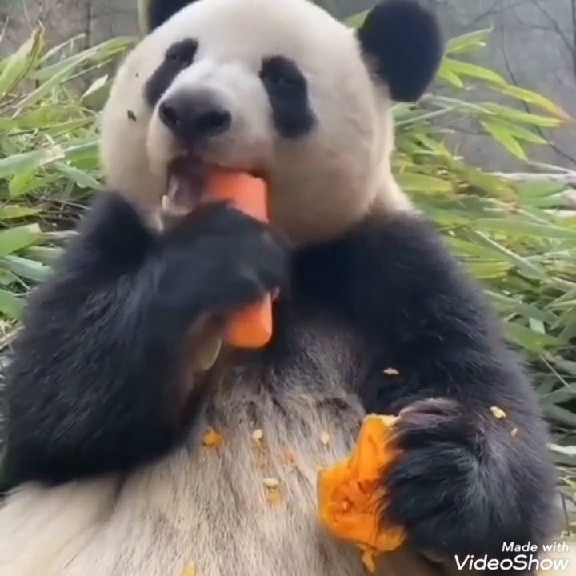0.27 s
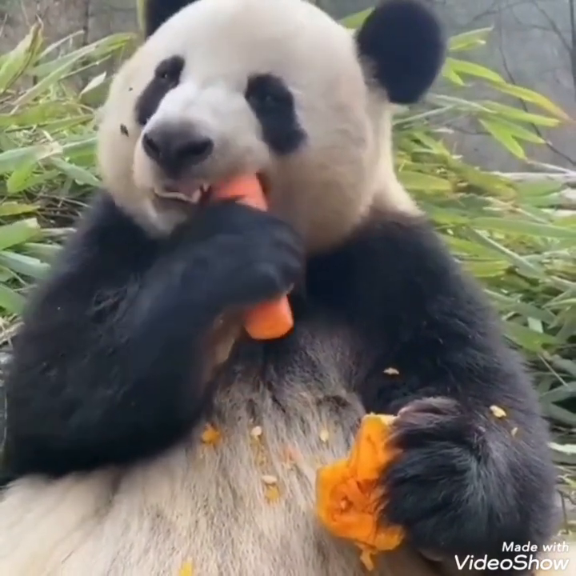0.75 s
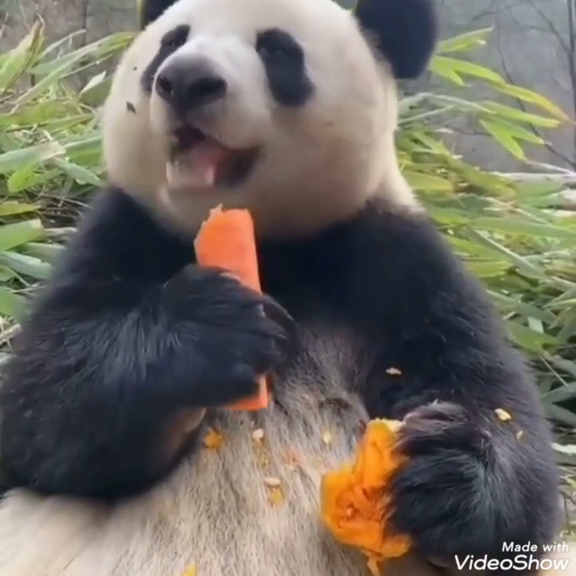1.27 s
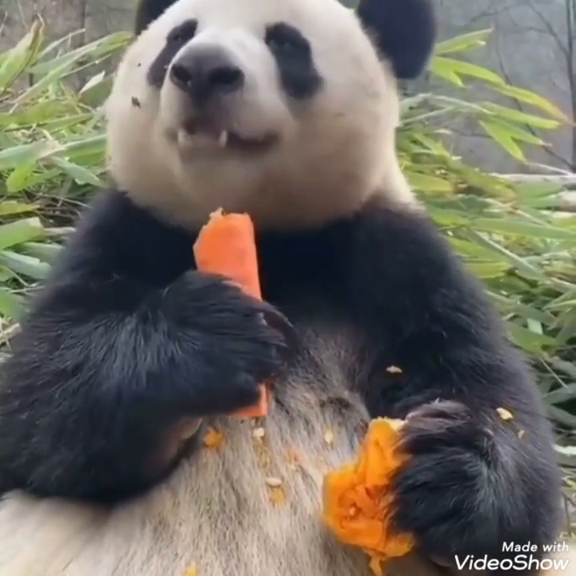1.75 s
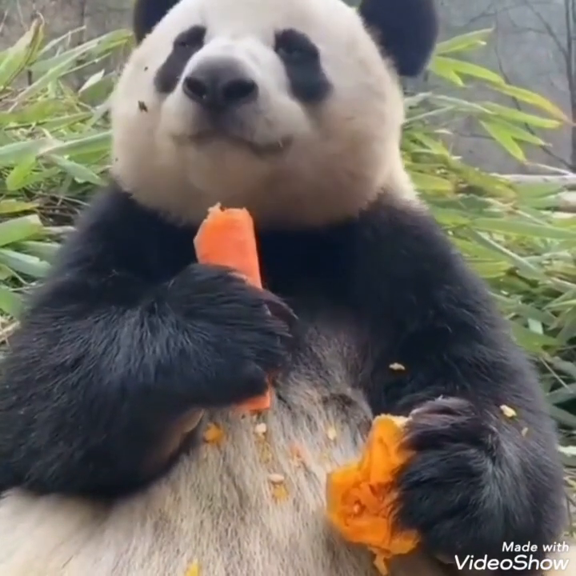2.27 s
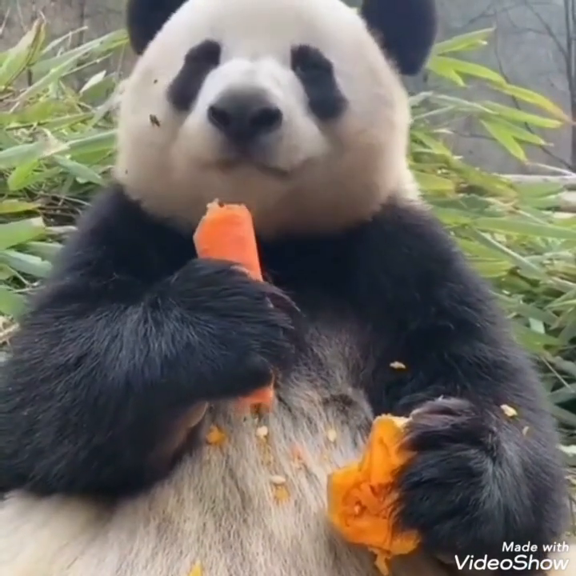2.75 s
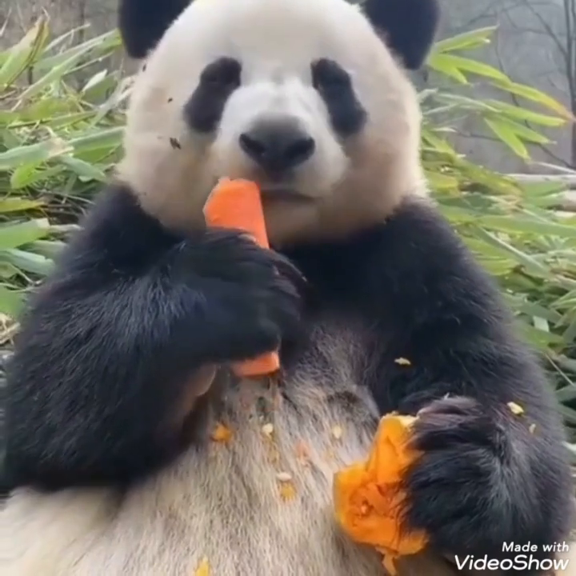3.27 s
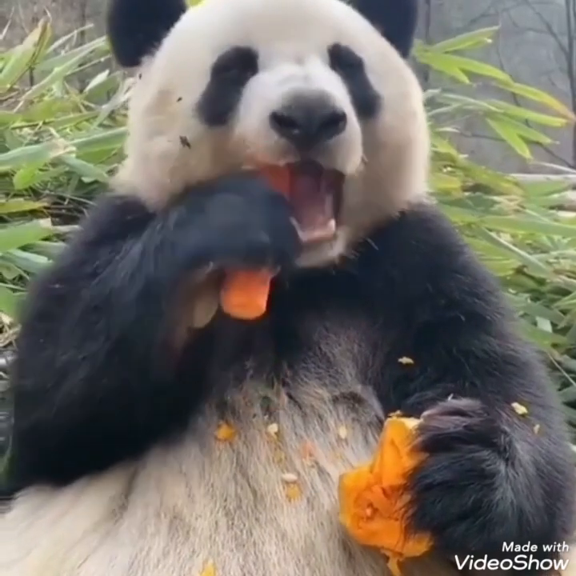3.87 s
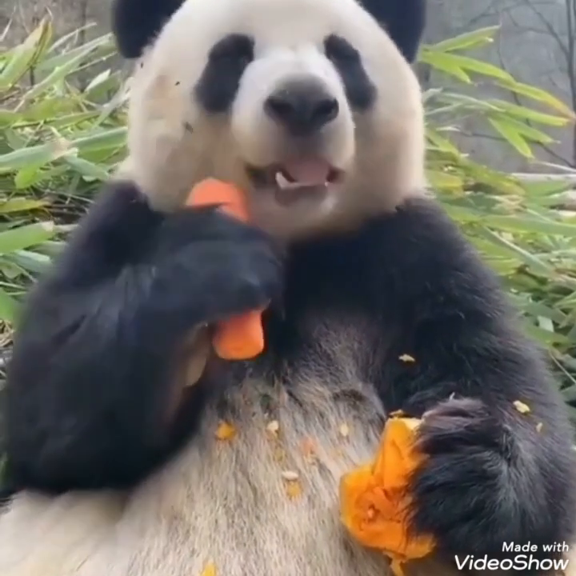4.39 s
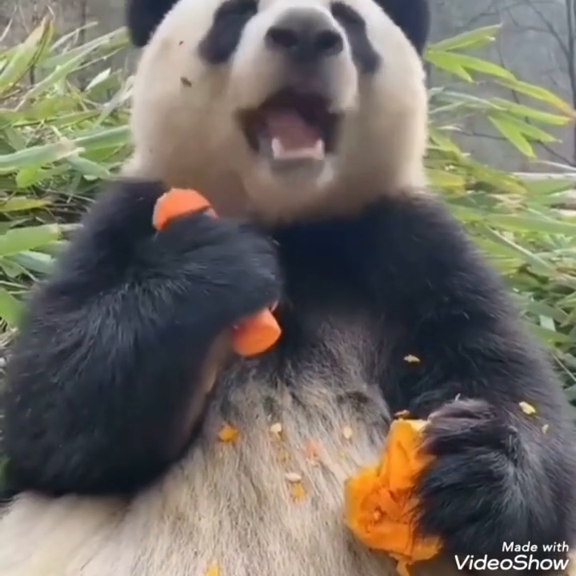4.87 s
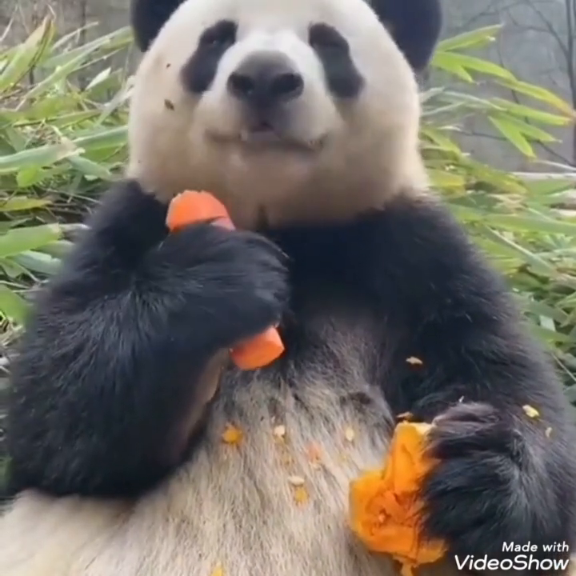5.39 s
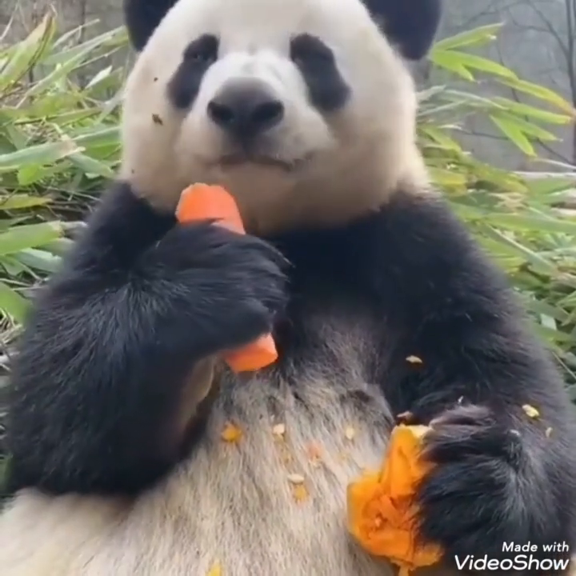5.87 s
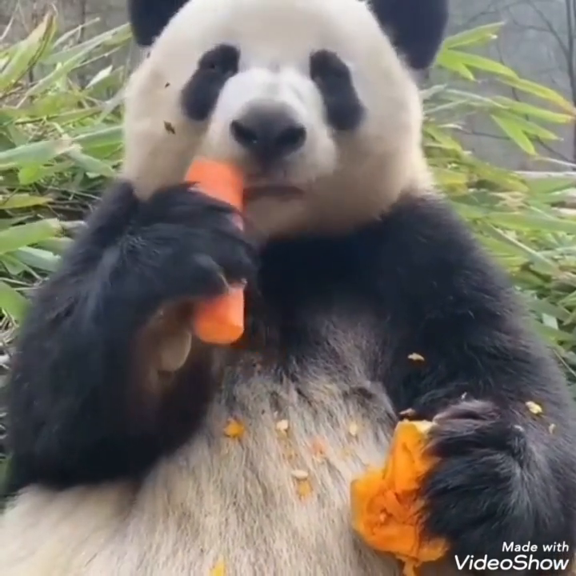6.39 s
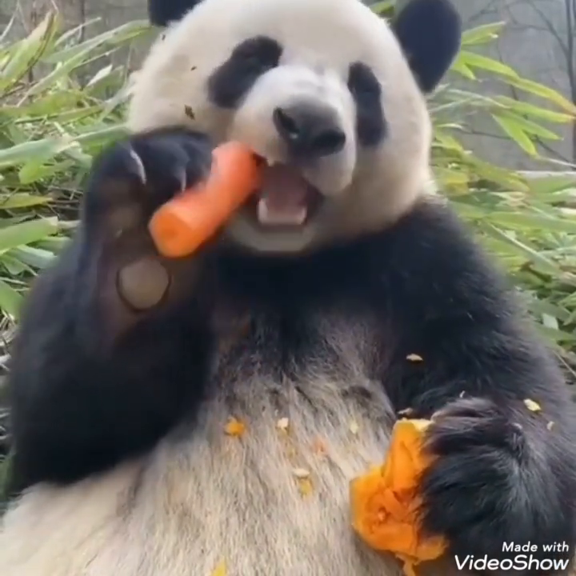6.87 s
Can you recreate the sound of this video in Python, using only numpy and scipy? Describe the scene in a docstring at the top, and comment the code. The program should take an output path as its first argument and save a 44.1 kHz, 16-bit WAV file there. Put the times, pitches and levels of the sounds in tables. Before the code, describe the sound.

Close to the microphone, a bear bites into a raw carrot with a quick cluster of sharp cracks, then grinds it in a run of juicy, irregular crunches. Just past the middle another hard snap comes, followed by a short lull and more crunching to the end. Moist mouth smacks and little thumps of parting lips dot the chewing, over a soft outdoor hiss and a faint low hum.

```python
"""Outdoors, up close: a bear chews a raw carrot.
Each jaw stroke crushes cells into a dense crackle that rings in the mouth, over a bed of wet mashing.
Larger pieces snap, small air pockets smack, and wet lips pop open with a falling thump.
Under it all lie a soft flickering hiss, a low rumble and hum, and a jaw drone that swells with chewing."""
import sys
import numpy as np
from scipy import signal
from scipy.io import wavfile
from scipy.ndimage import uniform_filter1d

SR = 44100
rng = np.random.default_rng(int(sys.argv[2]) if len(sys.argv) > 2 else 0)


def wrap_up_sound(samples):
    """Save the sound to the file named by the first command line argument, as 16-bit audio."""
    columns = np.atleast_2d(samples).T
    # keep every value between -1 and 1, then stretch to whole-number steps
    tamed = np.clip(columns, -1, 1)
    steps = np.round(tamed * 32767).astype(np.int16)
    wavfile.write(sys.argv[1], SR, steps)


N = 314433

# tone curve of the hiss: f/Hz, relative level/dB
HISS_CURVE = [(15, -41.5), (25, 11), (71, 10), (346, 3.5), (1080, 1.5), (1420, -21.5), (1780, -10),
              (2230, -1.5), (3750, -21), (7690, -40.5), (9380, -11.5), (12200, -56.5), (20600, -120)]
# faders of the three low bands: t/s, rumble level/dB, jaw drone level/dB, hum level/dB
RUMBLE_FADERS = [(0.0, -75, -43.5, -54.5), (0.38, -61.5, -68.5, -73.5), (0.87, -57.5, -69, -59),
                 (1.15, -61.5, -65, -75.5), (2.18, -62.5, -79, -71), (2.46, -57.5, -60, -61),
                 (2.78, -66, -58, -70), (3.2, -63, -65.5, -61.5), (3.85, -65, -69.5, -68),
                 (4.83, -62, -65.5, -81), (5.06, -55, -46.5, -57), (5.3, -69.5, -62, -68),
                 (5.94, -58.5, -67, -53), (6.17, -66.5, -66, -57.5), (6.75, -62, -61, -55.5),
                 (7.13, -67, -78, -79)]
# two resonances each for rumble, jaw drone and hum: f/Hz, width/Hz, relative level/dB
RUMBLE_BANDS = [[(61, 31, -0.0052), (93.6, 18, -1.2)], [(138, 90, 18.0), (214, 52, -15.5)],
                [(269.6, 79, 0.97), (460.0, 244, 0.47)]]
# faders of the wet mashing: t/s, body level/dB, treble level/dB
MASH_FADERS = [(0.0, -52, -55), (0.16, -48.5, -49.5), (0.4, -67.5, -60), (0.71, -53, -68),
               (1.2, -59.5, -54.5), (1.27, -63.5, -66.5), (1.39, -56, -52.5), (1.53, -56.5, -58.5),
               (2.88, -56, -57), (2.98, -54.5, -57), (3.73, -51.5, -54.5), (3.87, -61, -55.5),
               (4.45, -58, -56.5), (4.8, -64.5, -64), (4.91, -53.5, -65), (5.0, -58, -57.5),
               (5.82, -57, -52.5), (6.33, -51.5, -61), (6.75, -56.5, -53), (7.13, -57.5, -54.5)]
# resonances of head and carrot: f/Hz, width/Hz, relative level/dB
BODY_MODES = [(471, 380, -15), (850, 750, -7), (1450, 337, 4), (2070, 550, -0.5), (2760, 940, -2)]
# resonances of wet cell walls: f/Hz, width/Hz, relative level/dB
WALL_MODES = [(3280, 1820, 9), (4493, 1710, 13), (6335, 3280, 16.5), (8085, 3850, 11.5)]
# jaw strokes: t/s, length/s, top level/dB, place of the top/fraction of stroke, treble over body/dB,
# lower mouth resonance f/Hz, lower over upper resonance/dB
STROKES = [(.006, 0.13, -38, 0.63, -2.5, 1020, 0), (0.35, 0.046, -41, 0.66, 3.5, 1420, 14),
           (0.576, 0.15, -45.5, 0.53, 4, 730, 3), (0.692, 0.19, -32, 0.45, 0.5, 680, -13),
           (1.157, 0.076, -47, 0.9, -28, 1270, 7), (1.42, 0.15, -29.5, 0.48, -9, 874, -1.5),
           (1.648, 0.09, -30, 0.67, 0, 973, -0.5), (1.82, 0.16, -33, 0.48, -8, 1016, -4),
           (2.077, .12, -33, 0.66, 2.5, 1330, -14), (2.281, 0.15, -31.5, 0.46, -4.5, 1180, 1.5),
           (2.585, 0.088, -30.5, 0, -1, 1690, -4), (2.76, .14, -35, 0.47, -1, 740, 3),
           (3.051, 0.065, -35, 0.55, 0.5, 880, 3), (3.172, 0.16, -44, 0.05, -10, 825, 36),
           (3.44, 0.083, -46, 0.88, 6.5, 1410, 4), (3.606, 0.12, -44, 0.14, -4.5, 950, -2),
           (3.882, 0.06, -34.5, 0.4, -26, 765, 1), (4.092, 0.18, -37.5, 0.63, 9, 1450, -28),
           (4.237, 0.06, -21.5, 0.09, 2, 1410, -36), (4.644, 0.1, -43.5, 0.29, -5.5, 956, 5.5),
           (4.882, 0.094, -47.5, 0.4, -18, 700, 3), (5.011, .17, -29.5, 0.34, -5, 868, 1.5),
           (5.305, 0.048, -27, 0.03, 1, 960, -6), (5.438, 0.15, -36, 0.31, -7, 850, 3.5),
           (5.65, 0.16, -41, 0, -7.5, 1450, -3), (5.852, 0.13, -34.5, 0.3, -5.5, 856, 2.5),
           (6.109, 0.066, -29, 0.76, -7.5, 1200, 1.5), (6.25, 0.16, -46.5, 0.1, 1, 915, 23),
           (6.484, 0.048, -44.5, 0.33, 2.5, 1450, 7), (6.539, 0.048, -23.5, 0.48, -5.5, 1480, 29),
           (6.658, 0.21, -37, 0.17, -7.5, 916, 1), (6.899, 0.059, -39.5, 0.33, 2.5, 1020, -8),
           (7.016, 0.043, -34.5, 0.31, -5, 850, 0)]
# pieces that snap: t/s, level/dB, ring f/Hz, treble share/dB, 60 dB decay/s, build-up/ms
SNAPS = [(.023, -22.5, 905, -5.5, 0.018, 14), (0.059, -31, 869, 1, 0.04, 2.2),
         (0.08, -29, 2500, -16, 0.027, 2), (0.181, -30.5, 1280, 0.5, 0.014, 4.7),
         (0.269, -34.5, 2480, 0, 0.022, 0.65), (0.618, -30.5, 750, 0, 0.037, 1.7),
         (.712, -17, 2090, 0, 0.016, 1.5), (0.734, -9.5, 750, -.5, 0.036, 4.4),
         (0.753, -24, 2480, 0, 0.013, 1.3), (0.807, -19.5, 2700, 0, .03, 9.6),
         (0.812, -7, 2250, -12.5, 0.015, 0.88), (1.412, -34.5, 2800, 0, .01, .5),
         (1.435, -30.5, 2250, -7.5, .031, 2.2), (1.466, -24.5, 1330, -3.5, .035, 7.7),
         (1.491, -19, 2450, -5.5, 0.072, 5.5), (1.604, -30, 3240, 2, 0.03, 0.94),
         (1.647, -29.5, 2160, -1.5, 0.048, .8), (1.698, -21.5, 2140, -2, 0.037, 17),
         (2.043, -38.5, 1000, -17, 0.037, 1), (2.084, -31, 2670, -16, .072, 3.5),
         (2.133, -11, 2870, -2, 0.056, 9.1), (2.152, -32, 1300, -8, 0.021, 3),
         (2.293, -30, 1010, -4, 0.13, 2.5), (2.313, -31.5, 1100, -2, 0.025, 4.5),
         (2.348, -23.5, 1980, -5, 0.035, 3.8), (2.376, -24.5, 786, -2, 0.037, 11),
         (2.527, -26.5, 1410, 0, 0.015, 1.1), (2.567, -33.5, 3000, 0, 0.016, .8),
         (2.593, -19, 1900, 3, 0.027, 2.1), (2.622, -19, 1420, -1.5, 0.023, 2.7),
         (2.826, -27.5, 2560, -1, 0.05, 2.5), (3.008, -29.5, 1450, -1, 0.045, 2.6),
         (3.022, -14.5, 1010, -1, 0.021, 0.43), (3.065, -30, 1450, 0, 0.0092, .4),
         (3.081, -21.5, 2290, -8, 0.014, 4.3), (3.173, -31.5, 950, -13, 0.034, 1.9),
         (3.186, -24.5, 950, -2, 0.01, 1.8), (3.24, -28, 2700, 0, 0.022, 2.3),
         (3.323, -34, 1350, 0, 0.028, 1.7), (3.485, -18, 1120, -25, 0.042, .6),
         (3.497, -18.5, 1460, -8.5, 0.023, 3.9), (3.643, -31.5, 2680, -2.5, 0.013, 1.5),
         (3.662, -31.5, 2620, -9, .02, 1.5), (3.758, -19.5, 2680, 0, 0.026, 0.58),
         (3.842, -26, 2840, 0, 0.025, 6.4), (3.872, -36, 2980, 0, 0.0067, .6),
         (3.884, -24, 2360, 0, 0.019, 0.84), (4.244, -6.5, 1990, -2.5, 0.017, 1.3),
         (4.866, -23, 3080, 0, 0.011, 0.44), (4.886, -33.5, 2680, .5, 0.058, 1.6),
         (4.902, -35, 3000, 0, 0.028, 2.6), (4.928, -20, 640, -6.5, 0.0075, 2.7),
         (4.952, -23.5, 597, 0, .012, .4), (5.062, -20.5, 3400, -5, 0.054, 3.6),
         (5.091, -10.5, 830, -3, 0.016, 3.8), (5.106, -20.5, 940, -7, .035, 2.8),
         (5.286, -29, 3160, -3.5, 0.033, 1.3), (5.308, -8, 1012, -5, 0.028, 0.36),
         (5.453, -26, 1300, -4, 0.05, 6.4), (5.51, -24, 1770, -19, 0.032, 1.9),
         (5.636, -34, 3000, 0, 0.0061, 0.85), (5.666, -13.5, 1550, -7.5, 0.017, 1.4),
         (5.673, -16.5, 1470, -13, 0.02, 1.8), (5.7, -26, 3000, 0, .01, .7),
         (5.718, -8.5, 1520, -0.5, 0.014, 4), (5.748, -25.5, 820, -2.5, 0.029, 7.4),
         (5.876, -28, 2180, 0, 0.082, 4.5), (5.899, -15, 2340, 0, 0.038, 0.46),
         (6.022, -29, 2580, -2, 0.015, 2.3), (6.072, -27, 2560, -1.5, 0.013, 1),
         (6.094, -37.5, 1500, 0, .04, 3.3), (6.113, -27.5, 1310, 0, 0.0061, 0.59),
         (6.137, -28, 1440, -22, 0.04, 0.65), (6.249, -28, 916, -25, 0.076, 2.5),
         (6.277, -31, 2300, -2, .03, 4), (6.401, -25.5, 2840, -1, 0.014, 1.1),
         (6.538, -25.5, 1980, -2, 0.031, 0.71), (6.688, -26.5, 2300, 2, 0.055, 1.7),
         (6.731, -30.5, 900, -0.5, .03, 4.4), (6.764, -31.5, 2400, -.5, 0.014, 1.6),
         (6.803, -36, 2300, 0, .015, 1.5), (6.846, -28, 2360, 0, 0.017, 2),
         (6.896, -23, 3020, 0, 0.029, 0.78), (7.007, -27.5, 2550, 2, 0.032, 1.3)]
# wet smacks: t/s, level/dB, f/Hz, length/cycles
SMACKS = [(0.368, -19.5, 1373, 8.5), (0.381, -22.5, 1450, 8.1), (.821, -19.5, 720, 5.2),
          (1.18, -41, 2130, 25), (1.193, -36, 1287, 21.6), (2.147, -18.5, 1344, 18),
          (2.174, -25.5, 1300, 8.6), (3.019, -27.5, 1450, 10), (3.118, -31.5, 1450, 14),
          (3.73, -31, 1410, 6.6), (3.743, -35, 1450, 11), (3.905, -42, 850, 8.8), (4.371, -41, 1173, 29),
          (4.503, -40.5, 1534, 16.5), (4.54, -39.5, 1250, 5.8), (4.934, -31, 682, 7.5),
          (5.143, -28.5, 1253, 16), (5.685, -24, 1420, 6.3), (5.784, -29, 1850, 2.9),
          (6.554, -23, 1470, 7.9), (6.139, -26.5, 614, 5.5)]
# lips and tongue parting: t/s, level/dB, start f/Hz, end f/Hz, 60 dB decay/s
LIP_POPS = [(0.454, -30, 584, 105, 0.04), (0.827, -31, 400, 92, 0.11), (1.193, -33.5, 400, 114, 0.086),
            (1.431, -42, 400, 94, 0.081), (2.518, -34, 775, 308, 0.02), (2.583, -38, 250, 157, 0.18),
            (2.629, -39.5, 250, 174, .15), (2.826, -40, 200, 147, 0.24), (2.926, -39.5, 200, 161, 0.06),
            (2.981, -37, 600, 350, 0.031), (4.258, -34, 293, 89.5, 0.095), (4.392, -39, 600, 118, 0.033),
            (4.409, -27.5, 470, 61, 0.057), (4.499, -33, 734, 440, 0.023), (4.831, -38, 654, 152, 0.032),
            (4.955, -27, 694, 150, 0.03), (6.776, -34, 547, 200, 0.023)]

SNAP_LEAD_S = .035  # room for the build-up ahead of each break


def gain_of(db):
    return 10 ** (np.asarray(db) / 20)


def unit_rms(x):
    return x / np.sqrt(np.mean(x ** 2) + 1e-20)


def add(mix, start_s, sound):
    part = mix[max(round(start_s * SR), 0):][:len(sound)]
    part += sound[:len(part)]


def drift(span):
    """Smooth random modulation: noise averaged twice over span samples."""
    return unit_rms(uniform_filter1d(uniform_filter1d(rng.standard_normal(N), span), span))


def resonate(x, hz, width_hz):
    """A steep, sweepable resonance: shift hz down to zero, smooth twice, shift back."""
    carrier = np.exp(2j * np.pi * np.cumsum(hz * np.ones(len(x))) / SR)
    pole = np.exp(-np.pi * width_hz / SR)
    smoothed = signal.lfilter([(1 - pole) ** 2], [1, -2 * pole, pole * pole], x / carrier + 1e-18)
    return 2 * (carrier * smoothed).real


def ring(x, modes):
    """A resonator bank with alternating polarity, at unit level."""
    return unit_rms(sum((-1) ** k * gain_of(db) * resonate(x, hz, width)
                        for k, (hz, width, db) in enumerate(modes)))


def hiss(level_db=-57.5):
    """Soft steady hiss whose treble flickers at random."""
    hz = np.fft.rfftfreq(1024, 1 / SR)
    curve_hz, curve_db = np.transpose(HISS_CURVE)
    real, imag, flicker = rng.standard_normal((N // 256 + 5, 513, 3)).T
    flicker = unit_rms(uniform_filter1d(uniform_filter1d(flicker, 12, 0), 8, 1))
    tone_db = np.interp(np.log(hz + 1), np.log(curve_hz + 1), curve_db)[:, None]
    depth_db = np.where(hz < 1400, 2.5, 6.)[:, None]
    spectrum = (real + 1j * imag) * gain_of(tone_db + depth_db * flicker)
    return gain_of(level_db) * unit_rms(signal.istft(spectrum, nperseg=1024, noverlap=768)[1][:N])


def rumble(lump_db=2.2):
    """Low rumble, a jaw drone that swells with the chewing, and a low hum: lumpy noise on three faders."""
    times, *faders = np.transpose(RUMBLE_FADERS)
    out = np.zeros(N)
    for fader, band in zip(faders, RUMBLE_BANDS):
        level_db = np.interp(np.arange(N) / SR, times, fader) + lump_db * drift(1500)
        out += ring(rng.standard_normal(N), band) * gain_of(level_db)
    return out


def cells(samples, per_s, spread_db):
    """Bursting cells: random clicks, most small, a few large."""
    out = np.zeros(samples)
    bursts = rng.random(samples) < per_s / SR
    sizes = gain_of(spread_db * np.minimum(rng.exponential(1, bursts.sum()), 4))
    out[bursts] = sizes * rng.choice([-1., 1.], bursts.sum())
    return out


def droplets(pitches, low_hz, high_hz, per_s, cycles):
    """Wet grains: each is a short blip at its own pitch, sliding a little."""
    out = np.zeros(N)
    for hz in np.geomspace(low_hz, high_hz, pitches):
        progress = np.linspace(0, 1, max(int(cycles * rng.uniform(0.47, 2.06) * SR / hz), 8))
        glide_hz = hz * (1 + rng.normal(0, 0.16) * progress)
        grain = np.sin(np.pi * progress ** 0.51) ** 2 * np.sin(2 * np.pi * np.cumsum(glide_hz) / SR)
        out += signal.oaconvolve(cells(N, per_s / pitches, 3.), grain / np.linalg.norm(grain))[:N]
    return unit_rms(out)


def mashing(coarse, fine):
    """The wet bed under the strokes: the tongue keeps shifting the body resonances."""
    tongue = 1 + .08 * drift(4000)
    shifting = [(hz * tongue, width, db) for hz, width, db in BODY_MODES]
    times, body_db, treble_db = np.transpose(MASH_FADERS)
    t = np.arange(N) / SR
    body = gain_of(np.interp(t, times, body_db)) * ring(coarse, shifting)
    return body + gain_of(np.interp(t, times, treble_db)) * ring(fine, WALL_MODES)


def piece_modes():
    """A loose piece rings narrower than the whole body, and at its own pitch."""
    return [(hz * np.exp(rng.normal(0, 0.067)), 0.61 * width, db + rng.normal(0, 4.5))
            for hz, width, db in BODY_MODES]


def wall_modes():
    """The cell walls of every piece have their own treble colour."""
    return [(hz * rng.uniform(0.95, 1.06), .55 * width, db + rng.normal(0, 2.2))
            for hz, width, db in WALL_MODES]


def jaw_stroke(coarse, fine, length_s, top_db, top_at, treble_db, lower_hz, lower_db):
    """Teeth close: the crush swells and falls; the lower mouth resonance sinks, the upper one rises."""
    edge_db, upper_hz = -53.5, 2250
    progress = np.linspace(0, 1, len(coarse))
    top_at = np.clip(top_at, .05, .95)
    from_top = np.where(progress < top_at, (top_at - progress) / top_at, (progress - top_at) / (1 - top_at))
    crush = gain_of(top_db - max(top_db - edge_db, 0) * from_top ** 1.63)  # 1 = pointed, 2 = round
    fade_in = np.clip(progress * length_s / 0.0059, 0, 1)
    fade_out = np.clip((1 - progress) * length_s / 0.038, 0, 1)
    tongue = .04 * np.sin(2 * np.pi * (rng.uniform(.5, 2) * progress + rng.random()))
    sink = 1.08 - .16 * progress + tongue
    lower = gain_of(lower_db) * unit_rms(resonate(coarse, lower_hz * sink, 200))
    upper = unit_rms(resonate(coarse, upper_hz * rng.uniform(.9, 1.16) / sink, 600))
    bone = gain_of(-20) * unit_rms(resonate(coarse, 132, 210))  # grinding carried through the jaw
    body = unit_rms(unit_rms(lower + upper) + 0.68 * ring(coarse, piece_modes()))
    treble = gain_of(treble_db) * ring(fine, wall_modes())
    return crush * fade_in * fade_out * (body + bone + treble)


def chewing(mash_clump_db=1.5, stroke_clump_db=3.0):
    """One clumpy rasp of cells, juice and pulp feeds both the mashing and the jaw strokes."""
    low_clumps, high_clumps = drift(200), drift(200)
    coarse = unit_rms(cells(N, 4000, 2.5)) + .4 * droplets(16, 750, 3300, per_s=900, cycles=7)
    fine = unit_rms(cells(N, 8000, 2.8)) + .5 * droplets(20, 3400, 9000, per_s=1500, cycles=20)
    pulp = rng.standard_normal(N)  # pulp already ground slides smoothly
    out = mashing(coarse * gain_of(mash_clump_db * low_clumps) + 1.17 * pulp,
                  fine * gain_of(mash_clump_db * high_clumps) + 0.45 * pulp)
    crunch = coarse * gain_of(stroke_clump_db * low_clumps) + .15 * pulp
    crackle = fine * gain_of(stroke_clump_db * (0.24 * low_clumps + 0.76 * high_clumps)) + .3 * pulp
    for start_s, length_s, *settings in STROKES:
        part = slice(round(start_s * SR), round((start_s + length_s) * SR))
        add(out, start_s, jaw_stroke(crunch[part], crackle[part], length_s, *settings))
    return out


def snap(level_db, hz, treble_db, decay_s, build_ms):
    """A fracture gathers, breaks and dies: a rush of clicks that rings the piece and the mouth."""
    t = np.arange(4600) / SR - SNAP_LEAD_S
    build = np.exp(np.minimum(t, 0) / max(build_ms, .5) * 1000)
    tail = gain_of(-60 * (abs(t) / np.clip(decay_s, .006, .2)) ** 1.3)  # dies ever faster
    envelope = np.where(t < 0, build, tail)
    tick = np.zeros(len(t))
    tick[round(SNAP_LEAD_S * SR)] = 9 * np.exp(-build_ms / 1.18)  # only a fast break ticks cleanly
    coarse = (cells(len(t), 9000, 3.) + tick) * envelope
    fine = (cells(len(t), 12000, 3.5) + tick) * envelope
    body = unit_rms(unit_rms(resonate(coarse, hz, 0.28 * hz)) + 0.85 * ring(coarse, piece_modes()))
    treble_share = np.clip(gain_of(treble_db), 0, .98)
    sound = np.sqrt(1 - treble_share ** 2) * body + treble_share * ring(fine, wall_modes())
    peak = np.sqrt(2 * uniform_filter1d(sound ** 2, 90).max())
    return gain_of(level_db) * sound / peak


def smack(level_db, hz, cycles):
    """An air pocket rings in a soft pip, rising as it closes, while wet flesh rustles around it."""
    progress = np.linspace(0, 1, int(cycles * SR / hz))
    pip = np.sin(2 * np.pi * np.cumsum(hz * (0.939 + 0.12 * progress)) / SR)
    flesh = .34 * ring(cells(len(progress), 5000, 3.), BODY_MODES)
    return gain_of(level_db) * np.sin(np.pi * progress ** 0.78) ** 2 * (pip + flesh)


def lip_pop(level_db, start_hz, end_hz, decay_s):
    """A seal breaks and the cavity behind it grows, so the pitch falls; the wet edges flutter."""
    t = np.arange(6000) / SR
    flutter = 1 + .17 * unit_rms(uniform_filter1d(rng.standard_normal(len(t)), 150))
    hz = (end_hz + (start_hz - end_hz) * np.exp(-t / 0.0045)) * flutter
    gurgle = gain_of(3 * unit_rms(uniform_filter1d(rng.standard_normal(len(t)), 120)))
    envelope = gain_of(-60 * t / decay_s) * (1 - np.exp(-t / 0.016)) * gurgle
    return gain_of(level_db) * envelope / envelope.max() * np.sin(2 * np.pi * np.cumsum(hz) / SR)


def scatter(x, decay_s=0.052):
    """Early reflections off chest, ground and leaves: sparse taps dying fast."""
    t = np.arange(4000) / SR
    taps = rng.choice([-1., 1.], len(t)) * (rng.random(len(t)) < .05)
    taps *= gain_of(-60 * t / decay_s) * (t > .002)
    taps = uniform_filter1d(taps, size=5)  # fur soaks up the treble
    return signal.oaconvolve(x, taps / np.linalg.norm(taps))[:N]


def scene():
    """The mono mix: the mouth with its reflections and dry lip pops, over hiss and rumble."""
    mouth, lips = chewing(), np.zeros(N)
    for at_s, *settings in SNAPS:
        add(mouth, at_s + 0.0027 - SNAP_LEAD_S, snap(*settings))  # breaks just after the first crackle
    for at_s, level_db, hz, cycles in SMACKS:
        add(mouth, at_s - 0.3314 * cycles / hz, smack(level_db, hz, cycles))  # swells into its cue
    for at_s, *settings in LIP_POPS:
        add(lips, at_s, lip_pop(*settings))
    return (mouth + gain_of(-14.5) * scatter(mouth) + lips + hiss() + rumble())[None]


def record(dry, low_cut_hz=42, high_cut_hz=9600):
    """A small phone microphone: low cut, soft overload on the hardest cracks, steep high cut."""
    trimmed = signal.sosfilt(signal.butter(2, low_cut_hz, "high", fs=SR, output="sos"), dry)
    saturated = .9 * np.tanh(trimmed / .9)
    high_cut = signal.firwin(301, high_cut_hz, window=("kaiser", 6), fs=SR)
    return signal.oaconvolve(saturated, high_cut[None], "same")


dry = scene()
out = record(dry)
wrap_up_sound(out)
```